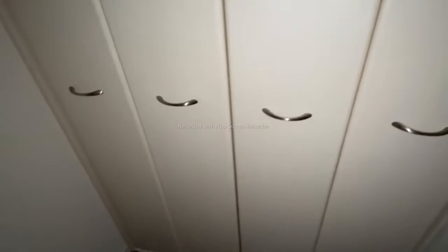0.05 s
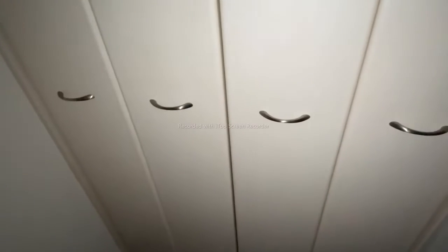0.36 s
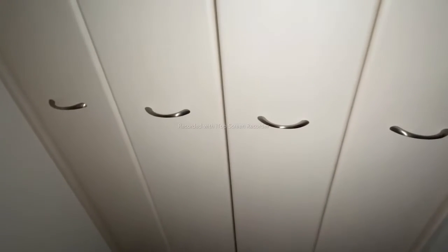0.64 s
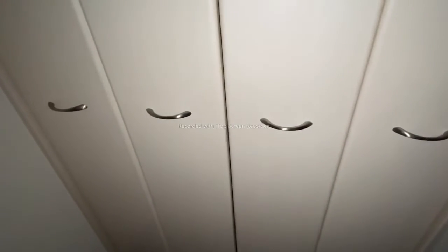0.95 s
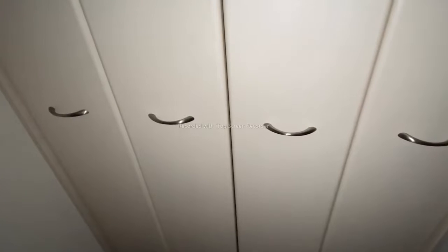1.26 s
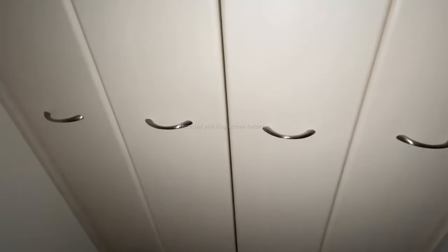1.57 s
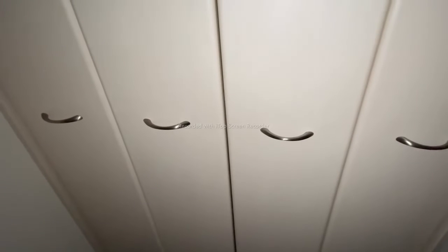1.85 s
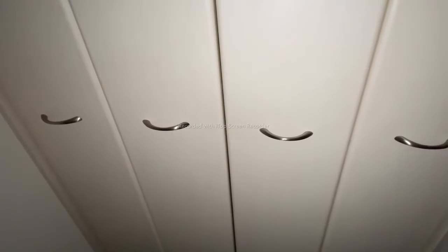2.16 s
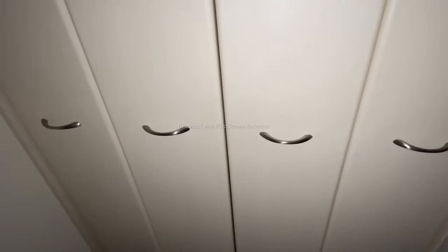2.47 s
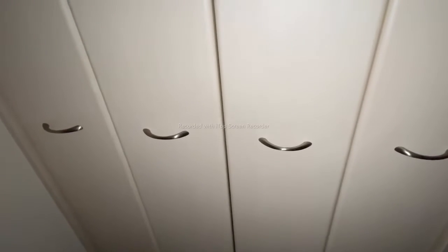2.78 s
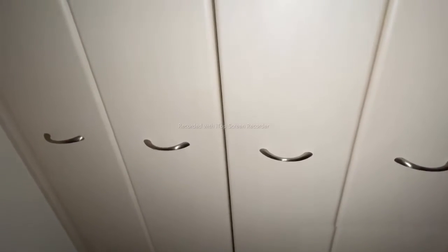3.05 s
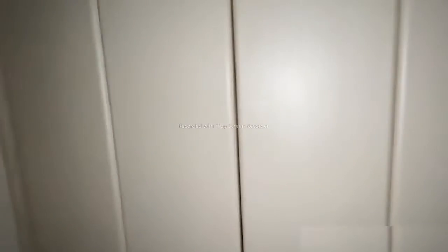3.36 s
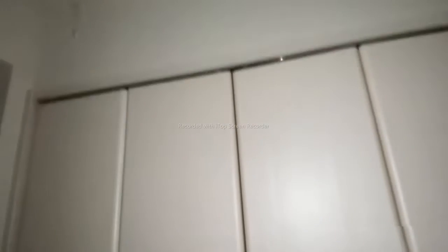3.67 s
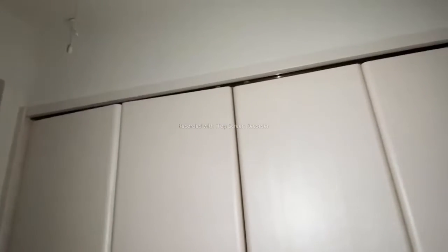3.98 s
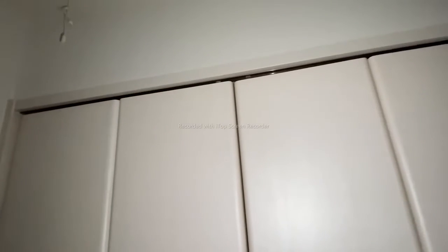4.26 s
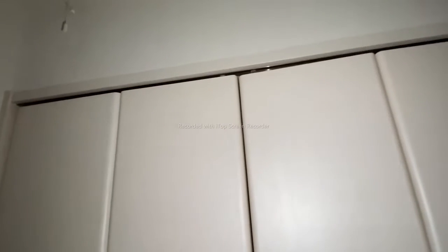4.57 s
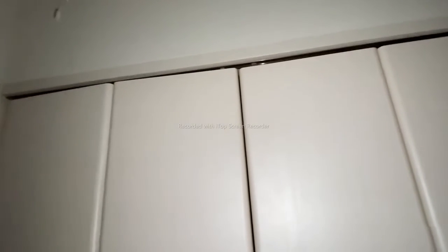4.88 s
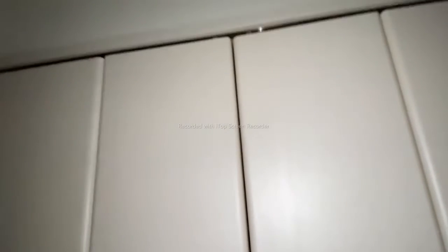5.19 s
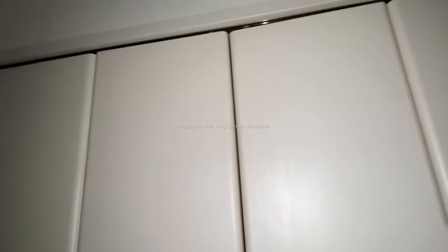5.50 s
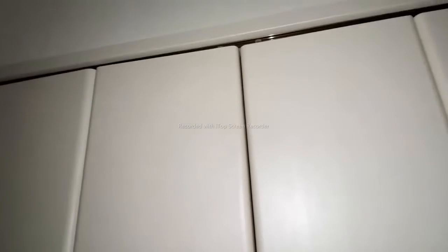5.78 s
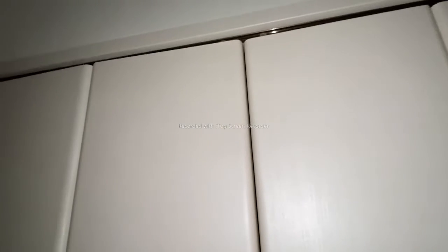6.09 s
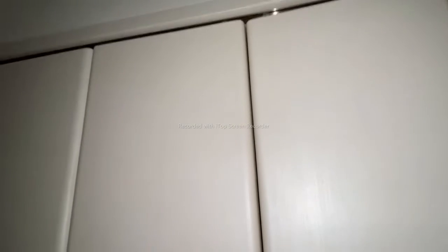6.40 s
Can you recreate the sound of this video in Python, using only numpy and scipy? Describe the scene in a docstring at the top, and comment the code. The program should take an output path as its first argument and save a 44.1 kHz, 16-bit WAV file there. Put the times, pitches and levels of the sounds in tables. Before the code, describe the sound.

In a small bare room, someone shakes closed folding closet doors close to the microphone. A light push leads to a hard shove, then uneven clusters of hollow wooden knocks follow, with a low boom and metal pins rattling in the track. A faint sleeve brush and a small tick come about halfway. Near the end the pins only click while the panels keep knocking.

```python
"""Shut folding closet doors are pushed and pulled by hand, two or three times a second, in a small bare room.
A faint rattle dies away under a light push, then comes a hard shove: the hollow panels knock on each other
and the frame and ring in their modes, the pivot pins rattle in their steel track, and the air in the
closet booms. This repeats unevenly. Midway a sleeve brushes by and a dry tick sounds close up. After five
seconds the pins only click, and the knocking goes on to the end."""
import sys
import numpy as np
from scipy import signal
from scipy.fft import rfft, irfft, next_fast_len
from scipy.io import wavfile
from scipy.ndimage import uniform_filter1d

SR = 44100
rng = np.random.default_rng(int(sys.argv[2]) if len(sys.argv) > 2 else 0)


def file_out(sig):
    """Save sig as 16-bit WAV at sys.argv[1]."""
    # one column per channel
    cols = np.atleast_2d(sig).T
    # limit, then scale
    lim = np.clip(cols, -1, 1)
    pcm = np.round(lim * 32767).astype(np.int16)
    wavfile.write(sys.argv[1], SR, pcm)


N = 288414

# Spectra of the room's hush, soft hisses, tick, steel track, panel edges and wood: f/Hz, level/dB
HUSH_SPECTRUM = [(15, -28), (25, -6), (70, 1), (184, 2.5), (279, -14), (365, -17.5), (566, -11.5),
                 (688, -23.5), (922, -32), (1820, -25.5), (3700, -30.5), (6020, -24), (8470, -63.5),
                 (11000, -60.5), (18600, -120)]
HISS_SPECTRUM = [(1000, -7), (2500, 1.5), (4800, -4.5), (6100, -1), (7500, -10.5), (9000, -40.5),
                 (15000, -29), (17000, -66.5)]
TICK_SPECTRUM = [(1000, -18), (4500, -11), (6500, 1.5), (7500, -11), (9000, -36), (12000, -26),
                 (15000, -26), (17000, -47)]
STEEL_SPECTRUM = [(1200, -29), (2400, -0.5), (3200, -11), (4000, -1), (4800, -3.5), (5600, 1), (6300, -0.5),
                  (7100, -9), (8000, -17), (8900, -53.5), (12000, -49.5), (15000, -45), (17000, -63)]
EDGE_SPECTRUM = [(800, -39), (1700, -7), (2300, 5.5), (2700, 1.5), (3200, -4.5), (3800, -4.5),
                 (4400, -10.5), (6000, -18.5), (8000, -60), (9000, -74)]
WOOD_SPECTRUM = [(300, -42.5), (600, -13), (900, -9.5), (1100, 0), (1350, -1), (1600, -0.5), (2000, -2.5),
                 (2450, -9.5), (3000, -12), (3900, -23.5), (5000, -38.5), (8000, -72.5), (10000, -91)]
# Modes of the closet's air, the track, the panels (low, higher) and boards: f/Hz, bandwidth/Hz, level/dB
CLOSET_MODES = [(44, 4.7, -0.5), (55.6, 11, 0), (78.7, 5.2, 3), (108, 55, -11.5)]
TRACK_MODES = [(3530, 43, 4), (4090, 11, 2.5), (5400, 120, -5), (5920, 33, -6), (5800, 56, -15)]
THUD_MODES = [(167.8, 10, -5), (193, 12, -7.5), (229.2, 13.7, -2), (256.3, 20.2, -0.5), (304.2, 21, 0.5),
              (377.3, 21, -8.5), (400.8, 17.2, -6)]
HOLLOW_MODES = [(458.3, 62, -3.5), (493, 16, 3), (510.4, 39, -9.5), (580.5, 12, 0.5), (682.6, 35, -9),
                (797, 96, -13)]
BOARD_MODES = [(1294, 46, -2), (1435, 27, 2.5), (1597, 96, -4.5), (1777, 32, -0.5), (1934, 44, -1.5),
               (2124, 170, -11), (2560, 63, -12.5)]
# Stereo gains, side over mid and left over right: f/Hz, gain/dB
SIDE_GAIN = [(60, -19), (130, -6.5), (300, -11), (400, 2), (500, 8.5), (750, 7.5), (1000, 1), (1500, -5),
             (3000, -4.5), (4200, -11.5), (7000, -10.5), (10000, 6)]
LEFT_BIAS = [(80, -0.5), (300, -2), (420, -1), (520, 2.5), (900, 2.5), (1300, 4.5), (3300, 4.5),
             (4300, 0.5), (8000, 0)]
# Soft high hisses, a rattle dying away at the start and then two sleeve brushes: t/s, duration/s, level/dB
SOFT_HISSES = [(0.0, 0.013, -67), (3.42, 0.34, -69), (4.54, 0.023, -69)]
# Pushes and pulls that rock the doors: t/s, duration/s, strength/dB, closet air level/dB
SHOVES = [(0.0, 0.25, -60, -63.5), (0.252, 0.27, -35, -42), (0.886, 0.1, -60, -53),
          (0.998, 0.23, -34, -40.5), (1.306, 0.086, -60.5, -47.5), (1.509, 0.24, -39, -44.5),
          (1.927, 0.15, -48, -47.5), (2.296, 0.32, -35.5, -43.5), (2.823, 0.27, -39, -43),
          (3.202, 0.25, -41.5, -43), (3.566, 0.25, -46, -50), (3.862, 0.24, -52.5, -56),
          (4.042, 0.26, -38, -45), (4.339, 0.2, -37.5, -44), (4.671, 0.043, -51.5, -50),
          (4.844, 0.34, -37, -43), (5.238, 0.22, -43.5, -45.5), (5.77, 0.21, -53, -50),
          (6.038, 0.1, -48.5, -51), (6.286, 0.34, -41, -43.5)]
# Shaking of the pins after hard shoves: t/s, level/dB, duration/s
PIN_RATTLES = [(0.253, -45, 0.033), (1.072, -50.5, 0.034), (1.501, -44.5, 0.061), (2.291, -46.5, 0.074),
               (2.852, -54.5, 0.041), (3.2, -46, 0.035), (4.032, -48, 0.058), (4.368, -57.5, 0.053),
               (4.851, -56.5, 0.086)]
# Contacts of panel on panel or frame: t/s, clack level/dB, clack f/Hz, snap level/dB, thud level/dB
KNOCKS = [(0.1502, -45.5, 1460, -75, -50), (0.2123, -41.5, 1210, -64.5, -40.5),
          (0.2641, -27.5, 1320, -37.5, -28), (0.3556, -34.5, 1590, -49, -48),
          (0.4567, -40, 1620, -71, -41.5), (0.5228, -37.5, 1470, -76, -59), (0.8398, -66, 1270, -99, -47),
          (0.8915, -54, 1570, -87, -49), (0.9513, -41.5, 1340, -68, -40.5), (1.0131, -28.5, 2000, -42, -34),
          (1.056, -32, 1780, -36, -55.5), (1.0698, -33.5, 1960, -32.5, -31.5), (1.093, -29, 1230, -48, -27),
          (1.1174, -32, 1310, -47, -48), (1.1534, -29, 1920, -47, -39.5), (1.1977, -33, 1490, -43, -43),
          (1.3135, -30.5, 1700, -40, -36.5), (1.4718, -35.5, 1470, -56, -39),
          (1.516, -26.5, 1430, -36.5, -34), (1.5496, -29.5, 1460, -44.5, -30),
          (1.7213, -36, 1460, -59.5, -33), (1.8497, -39.5, 1550, -58, -62.5),
          (1.8896, -41, 1920, -75.5, -42.5), (1.9535, -29.5, 1815, -43.5, -42),
          (2.2704, -34, 1940, -51.5, -32.5), (2.3081, -28.5, 1460, -39, -29.5),
          (2.4019, -32, 1610, -47.5, -35), (2.5702, -33.5, 1810, -56.5, -38),
          (2.7765, -34.5, 1530, -48.5, -40.5), (2.833, -31.5, 2440, -34, -32),
          (2.8653, -28.5, 1220, -36.5, -39), (2.9501, -29, 2030, -39, -37.5),
          (3.0059, -33.5, 1680, -48, -32.5), (3.1626, -36, 1770, -55, -33.5),
          (3.2132, -28, 1340, -40, -25.5), (3.243, -31.5, 1920, -41, -33.5), (3.3056, -34, 1750, -49, -42),
          (3.4024, -38, 1860, -74, -56), (3.5449, -42.5, 1590, -53, -52), (3.5908, -36, 1840, -50.5, -53),
          (3.616, -31.5, 1116, -50.5, -62), (3.6561, -39, 1720, -51.5, -43),
          (3.8806, -33, 1570, -61, -40.5), (4.0023, -35, 1630, -62, -39.5), (4.0437, -28.5, 2500, -37, -31),
          (4.0636, -29.5, 2290, -45, -31.5), (4.134, -35.5, 1950, -42.5, -59),
          (4.2548, -39.5, 1490, -73, -52), (4.3065, -35, 1550, -55, -47.5),
          (4.3265, -34.5, 1630, -45.5, -36), (4.364, -32, 1520, -39.5, -34.5),
          (4.402, -31, 1680, -39.5, -43), (4.4503, -32, 1450, -56.5, -34.5),
          (4.4921, -35.5, 1570, -47.5, -39.5), (4.6867, -34, 1760, -53, -37.5),
          (4.8095, -44.5, 1220, -56.5, -41.5), (4.8637, -31, 1510, -39.5, -38),
          (4.8981, -36, 1800, -39.5, -40.5), (5.1325, -49, 1390, -89, -42),
          (5.2037, -36, 1410, -55.5, -44.5), (5.2221, -32, 1620, -45.5, -41.5),
          (5.2658, -33.5, 1770, -40.5, -28), (5.2974, -33.5, 1440, -41, -45.5),
          (5.4239, -41.5, 1530, -71, -73), (5.7616, -41.5, 1700, -78, -44), (5.8424, -42, 1190, -80, -40),
          (5.8722, -34, 1230, -63, -49), (5.891, -34.5, 1440, -47, -41), (6.0545, -33, 1550, -63.5, -39.5),
          (6.1598, -45.5, 1570, -85, -47), (6.2557, -34.5, 1560, -62, -43.5),
          (6.2767, -33, 2550, -39.5, -45.5), (6.2937, -26.5, 1650, -50, -40), (6.315, -36, 1720, -37, -38),
          (6.345, -32.5, 1520, -39, -34), (6.4266, -29, 1750, -39, -36)]

TICK_S, TICK_DB = 3.457, -39.5
FIRM_SNAP_DB, FIRM_CUTOFF_HZ = -36.5, 9000  # a firm contact's snap level and treble limit
SNAP_DB_PER_OCTAVE = 17.5  # this much less snap halves the treble limit
PIN_DB, PIN_SLOPE = -8.5, 0.28  # pin click against snap; extra dB per dB of snap beyond firm
HOLLOW_DB = -12.5  # hollow ring against clack
HOLLOW_SLOPE, CLICK_SLOPE = 0.3, 0.2  # extra dB of ring and of first click per dB of snap over clack
GRAZE_S, GRAZE_DB, GRAZE_SLOPE = 0.005, -23.5, 0.15  # length; level against clack; dB less per dB of snap
TAP_DB, TAP_SPREAD_DB, TAP_SAG_DB_PER_S = -6, 13, 19.5  # taps against the strength of their shove
TAP_HZ, TAP_SNAP_DB, TAP_THUD_DB = 1600, -21, -5.5  # central pitch; snap and thud against clack
LOW_CUT_HZ, TOP_HZ = 30, 15700


def amp(db):
    """Amplitude ratio: a factor of ten for every 20 dB."""
    return 10 ** (np.asarray(db) / 20)


def unit(x):
    """Normalisation to an rms of 1."""
    return x / np.sqrt(np.mean(np.abs(x) ** 2) + 1e-20)


def grid():
    """Fourier frequencies of the scene, padded to leave room for ringing."""
    return np.fft.rfftfreq(2 * next_fast_len((N + SR) // 2), 1 / SR)


def along(points):
    """Interpolation of (f/Hz, value) points on a logarithmic frequency axis."""
    hz, values = np.transpose(points)
    return np.interp(np.log(grid() + 1), np.log(hz + 1), values)


def filtered(x, response):
    """Convolution: the spectrum is multiplied by a frequency response."""
    return irfft(rfft(x, 2 * len(response) - 2) * response)[..., :N]


def colour(points):
    """Minimum phase: folding the cepstrum gives a causal response with this spectral shape."""
    cepstrum = irfft(np.log(amp(along(points))))
    cepstrum[1:len(cepstrum) // 2] *= 2
    cepstrum[len(cepstrum) // 2 + 1:] = 0
    return unit(np.exp(rfft(cepstrum)))


def resonance(hz, width):
    """Response of a damped oscillator, 1 at its natural frequency."""
    f = grid()
    return 1j * f * width / (hz * hz - f * f + 1j * f * width)


def body(modes):
    """Modal superposition with alternating signs, falling steeply outside the range of the modes."""
    f = grid()
    ring = sum((-1) ** k * amp(db) * resonance(hz, width) for k, (hz, width, db) in enumerate(modes))
    lowpass = 1 / (1 + 1j * f / (2 * modes[-1][0])) ** 3
    highpass = (f / (f - 1j * modes[0][0])) ** 2
    return unit(ring * lowpass * highpass)


def material(spectrum, modes):
    """Narrow resonances stand out of a broadband response."""
    peaks = sum(amp(db) * resonance(hz, width) for hz, width, db in modes)
    return unit(colour(spectrum) * (1 + peaks))


def add(track, s, sound):
    """Superposition of a sound on a track at s seconds."""
    start = max(round(s * SR), 0)
    track[..., start:start + sound.shape[-1]] += sound[..., :N - start]


def grains(rate, spread_db):
    """Shot noise: mid and side streams of tiny uneven contacts, `rate` a second on average."""
    hit = rng.random((2, N)) < rate / SR
    return unit(hit * rng.choice([-1, 1], (2, N)) * amp(spread_db * rng.standard_normal((2, N))))


def sway(strokes, slack_db, slack_s, attack_s, jolt_db, jolt_s, sag_db_per_s, release_db_per_s):
    """Envelope of strokes that add in power: slack is taken up, then a jolt, a sagging hold and a fade."""
    power, t = np.zeros(N), np.arange(3 * SR // 2) / SR
    onset = 1 - np.exp(-t / attack_s)
    for s, length, db, *_ in strokes:
        held_db = db + jolt_db * np.exp(-t / jolt_s) - sag_db_per_s * t
        release_db = release_db_per_s * np.maximum(t - length, 0)
        slack = amp(db + slack_db)
        add(power, s, (amp(held_db - release_db) * onset + slack * (1 - onset)) ** 2)
        before = t[t < s][::-1]
        add(power, s - len(before) / SR, (slack * np.exp(-before / slack_s)) ** 2)
    return np.sqrt(power)


def blow(click_db, bounce_db, bounce_s, room_db, t60, build_s):
    """Impact in mid and side: an impulse and bounces from ahead, then diffuse reverberation."""
    t = np.arange(SR) / SR
    bounces = amp(bounce_db) * np.exp(-t / bounce_s) * [[1], [.65]]
    reverberation = amp(room_db - 60 * t / t60) * (1 - np.exp(-t / build_s))
    force = rng.standard_normal((2, SR)) * np.hypot(bounces, reverberation)
    force[0, 0] += amp(click_db)
    return force


def cushioned(force, snap_db):
    """Contact time limits bandwidth: a gentle contact lasts longer and has less treble."""
    octaves = (snap_db - FIRM_SNAP_DB) / SNAP_DB_PER_OCTAVE
    cutoff_hz = np.clip(FIRM_CUTOFF_HZ * 2 ** octaves, 2800, SR / 3)
    return signal.lfilter(*signal.butter(2, cutoff_hz, fs=SR), force)


def pitched(force, hz, q, broad):
    """Local resonance: the struck spot favours one pitch over the broadband rest."""
    b, a = signal.iirpeak(hz, q, fs=SR)
    return signal.lfilter(b, a, force) + broad * force


def room_hush():
    """Stationary noise, strongest in the bass, over a faint white floor."""
    return filtered(rng.standard_normal((2, N)), amp(-72) * colour(HUSH_SPECTRUM) + amp(-92))


def hisses_and_tick():
    """Dense tiny contacts merge into hiss (a dying rattle, then a sleeve); a damped noise burst ticks."""
    envelope = sway(SOFT_HISSES, slack_db=1, slack_s=0.03, attack_s=0.012,
                    jolt_db=4, jolt_s=0.05, sag_db_per_s=6.5, release_db_per_s=95.5)
    hiss = envelope * grains(rate=4700, spread_db=-3)
    tick, t = np.zeros((2, N)), np.arange(SR // 50) / SR
    add(tick[0], TICK_S, amp(TICK_DB) * np.exp(-t / 0.0019) * rng.standard_normal(len(t)))
    return filtered(hiss, colour(HISS_SPECTRUM)) + filtered(tick, colour(TICK_SPECTRUM))


def closet_boom():
    """Cavity resonance: the swaying doors pump the air behind them, which booms in its low modes."""
    strokes = [(s, length, air_db) for s, length, _, air_db in SHOVES]
    pumping = sway(strokes, slack_db=-14, slack_s=0.013, attack_s=0.028,
                   jolt_db=1, jolt_s=0.098, sag_db_per_s=18, release_db_per_s=113)
    boom = filtered(rng.standard_normal((2, N)), body(CLOSET_MODES))
    running_rms = np.sqrt(uniform_filter1d(boom[0] ** 2, size=SR // 14).clip(1e-6))
    return pumping * boom / running_rms


def pivot_pins(contacts):
    """Impacts excite the steel track's modes: pins click at each contact and rattle after hard shoves."""
    shaking, echo, t = np.zeros(N), np.zeros(N), np.arange(SR) / SR
    for s, db, length in PIN_RATTLES:
        after = np.maximum(t - length, 0)
        add(shaking, s, amp(db - 60 * after / 0.13) * (1 - np.exp(-t / 0.0077)) ** 2)
        add(echo, s, amp(db + 1 - 60 * after / 0.38) * (1 - np.exp(-t / 0.017)))  # room fills and empties
    force = shaking * grains(rate=700, spread_db=-4.5) + echo * rng.standard_normal((2, N))
    for s, _, _, snap_db, _ in contacts:
        pin_db = snap_db + PIN_DB + PIN_SLOPE * (snap_db - FIRM_SNAP_DB)
        click = blow(click_db=7.5, bounce_db=-8, bounce_s=0.0057, room_db=-5, t60=0.21, build_s=0.027)
        add(force, s, amp(pin_db) * click)
    return filtered(force, material(STEEL_SPECTRUM, TRACK_MODES))


def loose_taps(count):
    """Play in the panels allows `count` chance contacts per shove, given as rows like KNOCKS."""
    rows = []
    for s, length, strength_db, _ in SHOVES:
        for k, (when, loud, high) in enumerate(rng.uniform(-1, 1, (count, 3))):
            after = length * (k + (1 + when) / 2) / count
            db = strength_db + TAP_DB - TAP_SAG_DB_PER_S * after + TAP_SPREAD_DB * loud
            rows.append((s + after, db, TAP_HZ * 2 ** (0.3 * high), db + TAP_SNAP_DB, db + TAP_THUD_DB))
    return [row for row in rows if row[0] < (N - 1) / SR]


def edge_snaps(contacts):
    """A brief impact has a wide spectrum: hard edges meet with a bright snap."""
    force = np.zeros((2, N))
    for s, _, _, snap_db, _ in contacts:
        snap = blow(click_db=13.5, bounce_db=-2.5, bounce_s=0.0078, room_db=-7, t60=0.28, build_s=0.014)
        add(force, s, amp(snap_db) * cushioned(snap, snap_db))
    return filtered(force, colour(EDGE_SPECTRUM))


def hollow_panels(contacts):
    """Modal vibration: panels thud in their low modes, knock in higher ones and shudder as they rock."""
    rocking = sway(SHOVES, slack_db=-0.5, slack_s=0.026, attack_s=0.018,
                   jolt_db=8, jolt_s=0.058, sag_db_per_s=28, release_db_per_s=151)
    shudder = amp(-6.5) * rocking * grains(rate=750, spread_db=-1)
    thuds, knocks = np.zeros((2, 2, N))
    for s, clack_db, _, snap_db, thud_db in contacts:
        hollow_db = clack_db + HOLLOW_DB + HOLLOW_SLOPE * (snap_db - clack_db)
        thud = blow(click_db=22, bounce_db=-6, bounce_s=0.018, room_db=-8.5, t60=0.56, build_s=0.006)
        knock = blow(click_db=22, bounce_db=-6.5, bounce_s=0.04, room_db=-6, t60=0.43, build_s=0.0099)
        add(thuds, s, amp(thud_db) * thud)
        add(knocks, s, amp(hollow_db) * knock)
    inertia = 1 / (1 + (1j * grid() / 620) ** 2 + 1j * grid() / 480)  # a heavy panel starts gently
    low_ring = filtered(thuds + shudder, amp(-1) * inertia * body(THUD_MODES))
    hollow_ring = filtered(knocks + amp(-15.5) * shudder, body(HOLLOW_MODES))
    return low_ring + hollow_ring


def wood_clacks(contacts):
    """Impact and friction drive the boards' modes: each contact grazes, then clacks, and the hinges rub."""
    rubbing = sway(SHOVES, slack_db=-5.5, slack_s=0.023, attack_s=0.014,
                   jolt_db=11, jolt_s=0.059, sag_db_per_s=48.5, release_db_per_s=151)
    force = amp(-15.5) * rubbing * grains(rate=750, spread_db=0)
    for s, clack_db, hz, snap_db, _ in contacts:
        graze = rng.standard_normal((2, SR // 20))[:, :round(GRAZE_S * SR)]
        graze_db = clack_db + GRAZE_DB - GRAZE_SLOPE * (snap_db - FIRM_SNAP_DB)
        add(force, s - GRAZE_S, amp(graze_db) * pitched(graze, hz, q=3.6, broad=0.16))
        click_db = 8 + CLICK_SLOPE * (snap_db - clack_db)
        clack = blow(click_db, bounce_db=-7, bounce_s=0.0078, room_db=-15.5, t60=0.37, build_s=0.0032)
        add(force, s, amp(clack_db) * pitched(cushioned(clack, snap_db), hz, q=7.1, broad=0.55))
    return filtered(force, material(WOOD_SPECTRUM, BOARD_MODES))


def scene():
    """Superposition of all sources in mid and side, whose sum and difference give left and right."""
    hush = room_hush()
    contacts = KNOCKS + loose_taps(count=3)
    doors = wood_clacks(contacts) + hollow_panels(contacts) + edge_snaps(contacts) + pivot_pins(contacts)
    mid, side = doors + closet_boom() + hisses_and_tick() + hush
    side = filtered(side, amp(along(SIDE_GAIN)))
    lean = amp(along(LEFT_BIAS) / 2)
    return np.array([filtered(mid + side, lean), filtered(mid - side, 1 / lean)])


def record(dry):
    """Band limiting: a second-order high-pass thins the deepest bass, and nothing passes above TOP_HZ."""
    f = grid()
    return filtered(dry, (f < TOP_HZ) * f ** 2 / np.hypot(f ** 2, LOW_CUT_HZ ** 2))


dry = scene()
out = record(dry)
file_out(out)
```